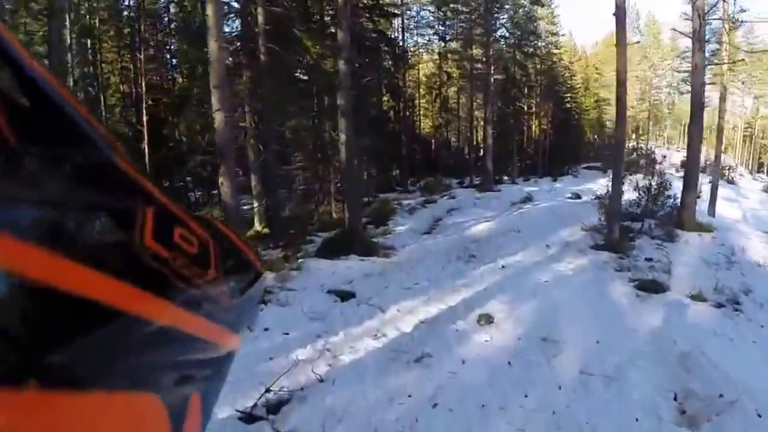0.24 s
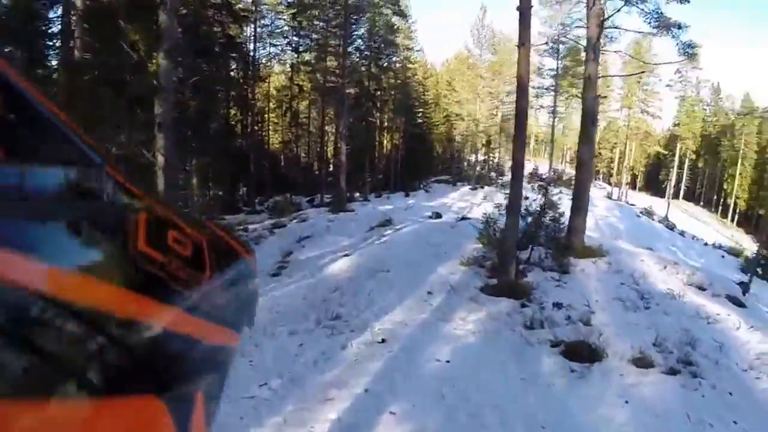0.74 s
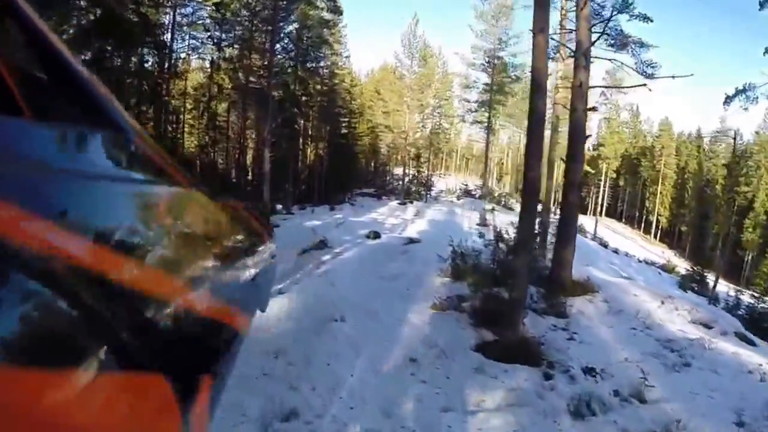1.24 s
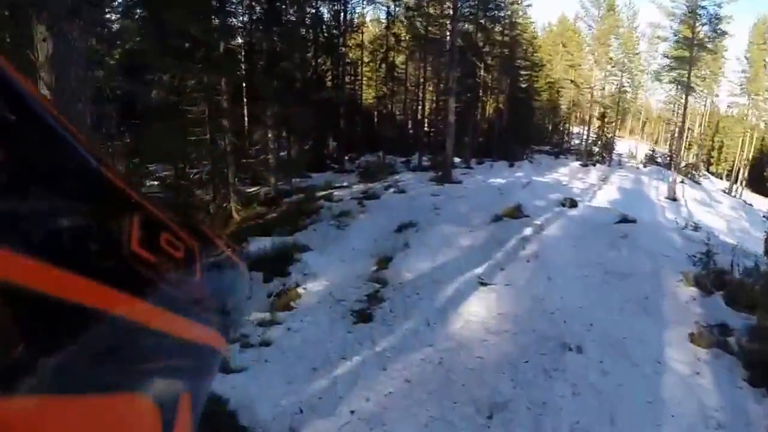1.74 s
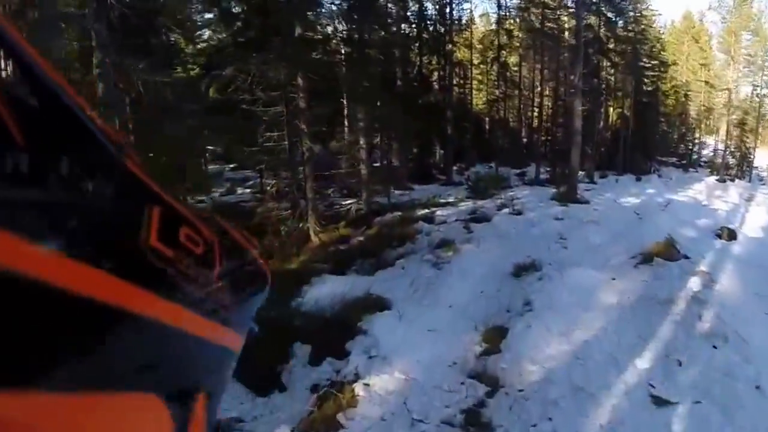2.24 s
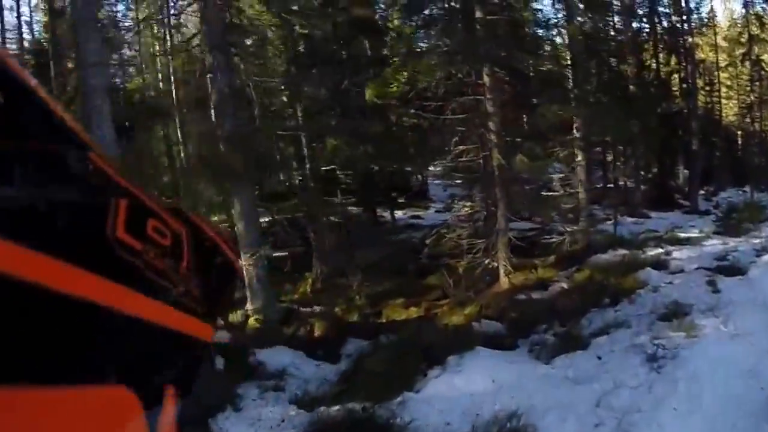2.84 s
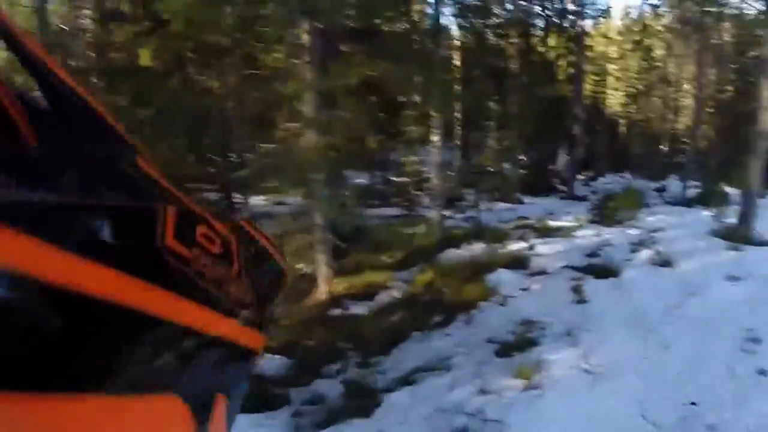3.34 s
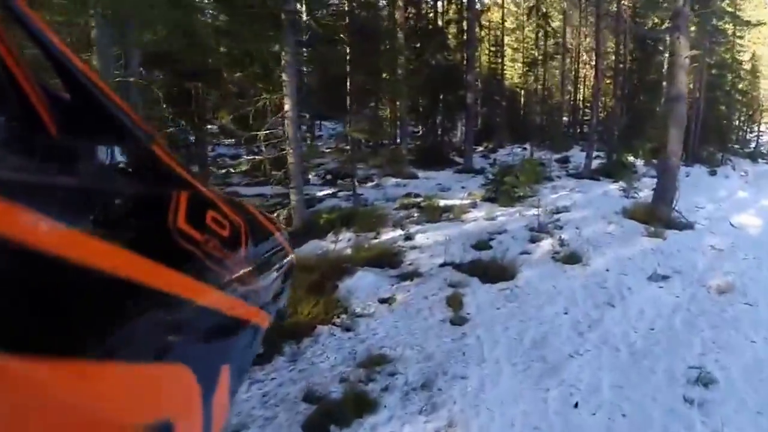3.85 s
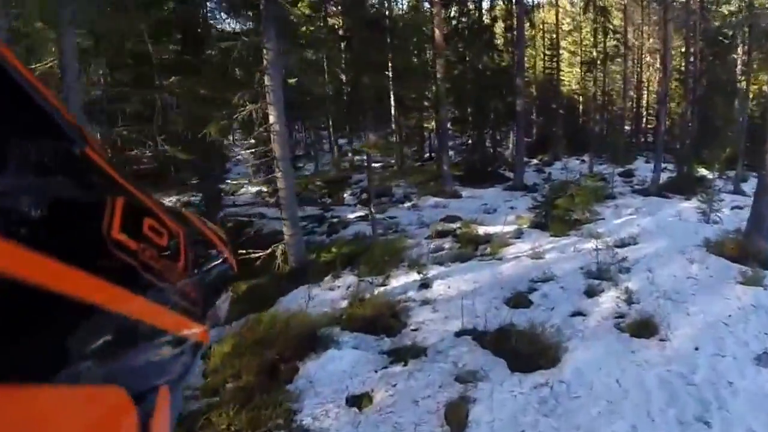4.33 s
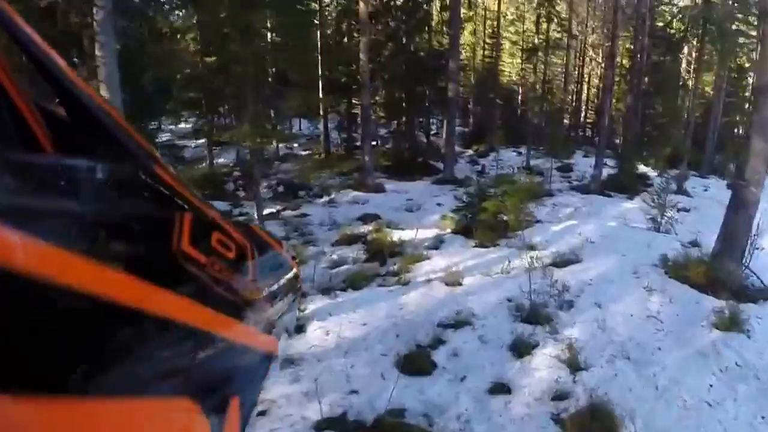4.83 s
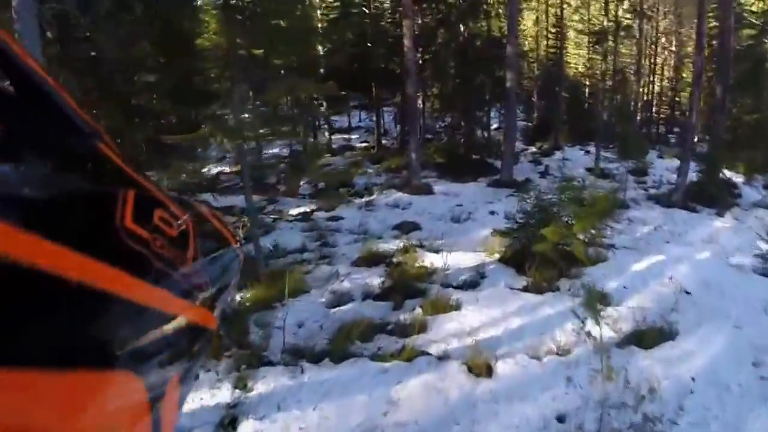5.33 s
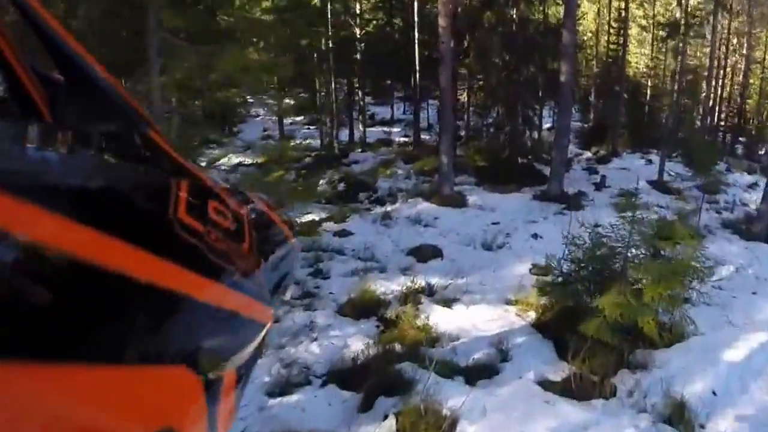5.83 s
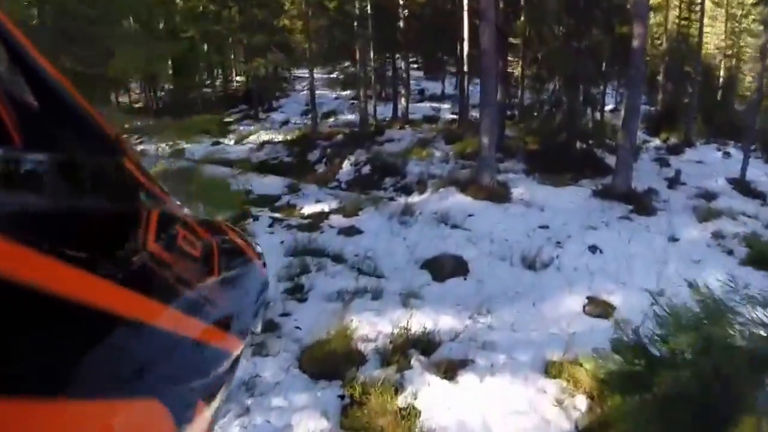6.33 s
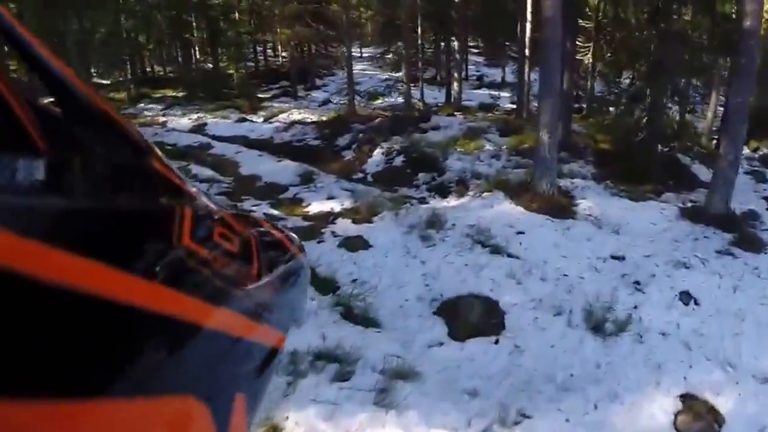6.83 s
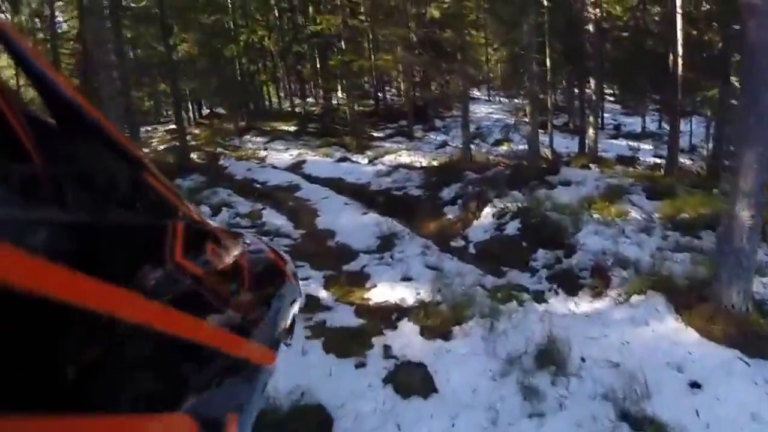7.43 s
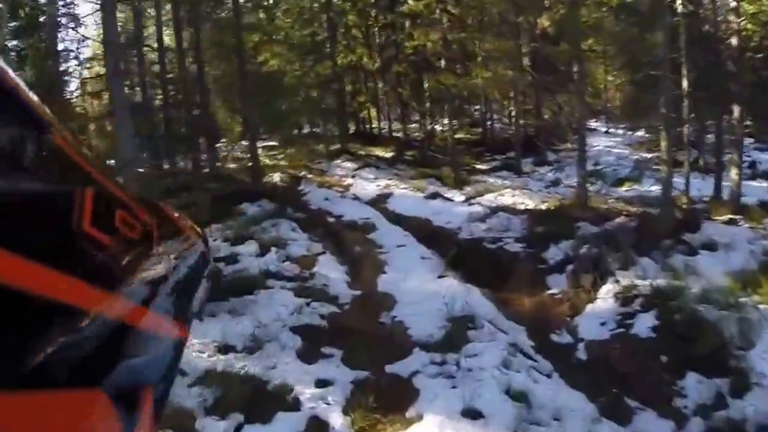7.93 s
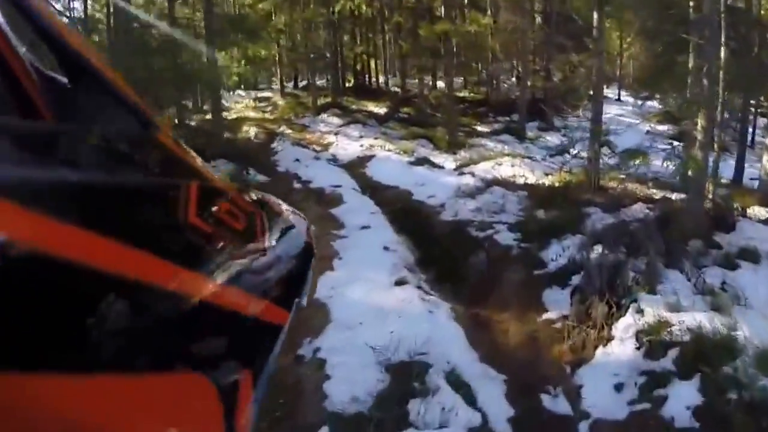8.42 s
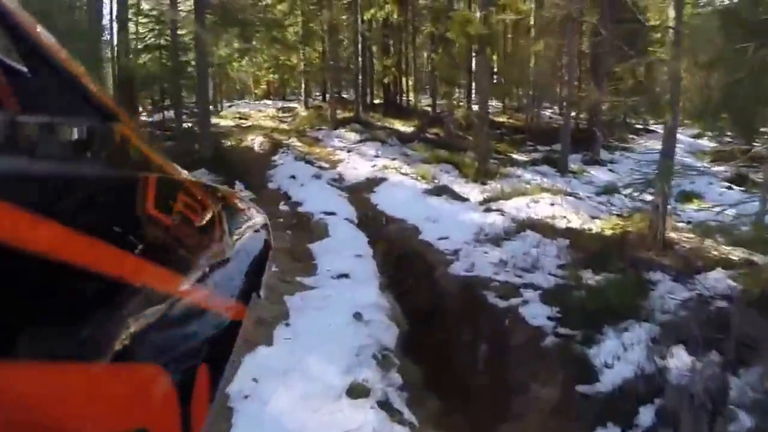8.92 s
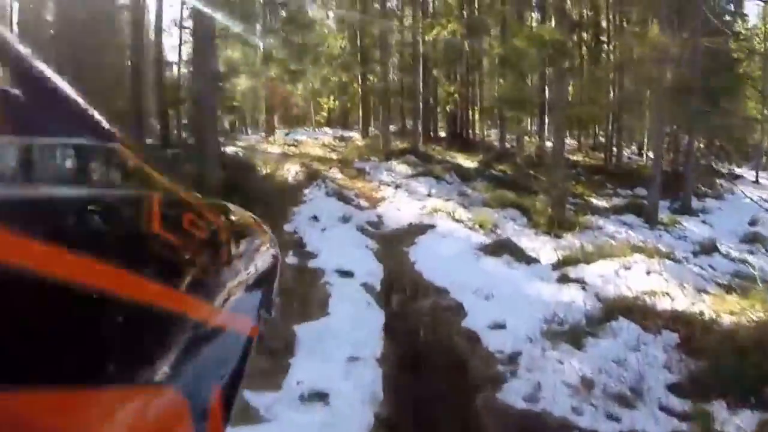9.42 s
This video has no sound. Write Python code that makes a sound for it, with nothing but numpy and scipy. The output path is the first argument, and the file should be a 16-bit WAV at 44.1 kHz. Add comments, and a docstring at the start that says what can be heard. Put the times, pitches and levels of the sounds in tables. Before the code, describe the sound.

A small two-stroke dirt bike rides slowly over rough forest ground, heard close and dry from the rider's helmet for nearly ten seconds. From the start the engine makes a deep, stumbling hum under a pulsing rush of exhaust. At about 0.5 seconds the throttle opens briefly. Then the engine runs on little gas, firing irregularly around ten times a second, each rasping pop giving a short, tinny ring in the steel pipe. Bumps send dull thuds and knocks through the frame near 0.9 and 2.2 seconds, hardest between 3.1 and 3.5. The firings grow stronger from about 4.5 to 5 seconds, then thin out, with more knocks around 7.4 and 7.8. At 8.7 seconds a short roar comes with a thump. From 9 seconds the throttle opens again and the engine speeds up slightly until the end.

```python
"""A small two-stroke motorcycle picks its way through a snowy forest, heard from the rider's helmet.
From the start the crank's once-a-turn shake is a deep hum. At 0.5 s the throttle opens briefly; then,
on little throttle, the cylinder fires only every few turns, each rasping burst ringing the thin steel
pipe. Bumps in the ground knock through the frame, hardest near 3.4 s. A short roar comes at 8.7 s,
and from 9 s the throttle opens again and the engine speeds up."""
import sys
import numpy as np
from scipy import signal
from scipy.fft import rfft, irfft, next_fast_len
from scipy.io import wavfile
from scipy.ndimage import uniform_filter1d, map_coordinates

SR = 44100
rng = np.random.default_rng(int(sys.argv[2]) if len(sys.argv) > 2 else 0)


def persist_wave(psi):
    """Save psi, clipped to +-1, as 16-bit WAV."""
    counts = np.round(np.clip(psi, -1, 1) * 32767).astype(np.int16)
    wavfile.write(sys.argv[1], SR, np.atleast_2d(counts).T)


N = 426447
FFT_SIZE = next_fast_len(N + SR // 4)
GRID_HZ = np.fft.rfftfreq(FFT_SIZE, 1 / SR)

# Levels in all tables are relative: each layer adds its own offset.
# running noise between firings: (time [s], gas rush [dB], frame rumble [dB])
RUNNING_NOISE = [(0.0, -49, -48), (0.38, -52.5, -53), (0.65, -46, -41.5), (0.89, -56, -45),
                 (1.64, -54.5, -46), (1.94, -53.5, -44.5), (2.18, -51.5, -47), (2.64, -53, -47.5),
                 (3.39, -52, -45), (3.69, -54.5, -51), (4.74, -51.5, -45), (4.93, -52.5, -51.5),
                 (5.6, -54.5, -51.5), (6.73, -53, -50.5), (7.03, -52, -50.5), (7.78, -52.5, -50),
                 (8.62, -54.5, -48), (8.92, -55, -46), (9.15, -52, -51), (9.35, -52.5, -58),
                 (9.67, -47.5, -59)]
# how strongly the pipe answers the gas: (time [s], neck [dB], belly [dB], pop [dB])
PIPE_RESPONSE = [(0, -6, -2, 3), (.45, -2, -10, -2), (.65, -2, -4, -3), (.8, 2, -5, -4), (.88, -4, -8, -2),
                 (1.0, -5.5, -8, 4), (1.4, -9, -11, 4), (1.7, -6, -2, 5), (2.0, 1.5, -8, -3.5),
                 (2.5, 2, -10, -23), (2.85, 1.5, -2, -3), (3.5, -2.5, 11, -2), (4.0, -2, -3, 2),
                 (4.55, -0.5, 6, -3.5), (4.9, 5.5, 3, -7), (5.3, -0.5, 4, 3), (5.7, 2, 6, 1),
                 (6.5, 1, 7, -1.5), (6.95, -2, 0, -1), (7.2, -10, -3, 4), (7.55, 0.5, 1, 1),
                 (8.0, 1.5, 4, -17), (8.3, 1, 3, -27), (8.55, -1, 13, -3), (8.8, 2.5, -6, -10),
                 (9.12, 6.5, -6, 4), (9.2, 4, -2, -5), (9.67, 2, 12, -4)]
# firings: (time [s], rasp [dB], neck [dB], belly [dB], growl [dB], bright edge [dB], neck pitch [Hz])
CYLINDER_FIRINGS = [(0.044, -37, -37, -47, -43, -48.5, 2770), (0.189, -33, -45, -48, -47, -58, 2750),
                    (0.266, -38, -44, -59, -48, -48, 2910), (0.345, -32, -39, -46, -39, -48, 2720),
                    (0.425, -27, -35, -55, -37, -46, 2970), (0.501, -24.5, -31.5, -45, -34, -49, 2750),
                    (0.5504, -44, -39, -45, -57, -59, 2910), (0.674, -30, -44, -52, -35.5, -53, 2770),
                    (0.732, -42, -44, -45, -36, -47, 2670), (0.815, -38, -41, -57, -38, -50, 2830),
                    (0.9386, -29, -47, -53, -39, -50, 2790), (1.062, -32, -41, -51, -37, -51, 2940),
                    (1.1293, -32, -45, -52, -36, -48, 2710), (1.1977, -28, -41, -51, -33.5, -53, 2800),
                    (1.2436, -33, -39, -52, -37, -50, 2870), (1.289, -43, -52, -53, -39, -56, 2767),
                    (1.3358, -32, -42, -54, -34.5, -53, 2790), (1.4114, -32, -45, -52, -36, -50, 2965),
                    (1.5149, -36, -41, -47, -39, -53, 2800), (1.59, -36, -49, -56, -57, -55, 2760),
                    (1.6411, -32, -54, -48, -45, -65, 2920), (1.753, -28.5, -40, -45, -46, -49.5, 2900),
                    (1.832, -28, -34.5, -51, -44, -55, 2840), (1.9077, -29, -40, -52, -36, -52, 2810),
                    (1.953, -33, -45, -56, -44, -52, 2960), (2.0019, -28, -47, -55, -35.5, -54, 2890),
                    (2.048, -30.5, -40, -49, -37, -61, 2730), (2.1237, -31, -36, -50, -38, -47.5, 2700),
                    (2.249, -39, -38, -46, -36, -49, 2920), (2.379, -29.5, -32.5, -44, -37, -46, 2890),
                    (2.4785, -38, -49, -45, -51, -57, 2810), (2.5342, -28, -33, -42, -33, -45.5, 2870),
                    (2.6354, -36, -44, -48, -52, -67, 2800), (2.7133, -34, -38, -39, -44, -62, 2910),
                    (2.7911, -42, -39, -41, -38, -57, 2713), (2.8662, -32, -39, -41, -39, -55, 2930),
                    (2.9931, -36, -36, -40, -36, -49, 2880), (3.238, -42, -38, -46, -38.5, -58, 2620),
                    (3.424, -48, -44, -47, -39, -51, 2630), (3.5446, -44, -49, -50, -50, -58, 2740),
                    (3.696, -35, -43, -45, -51, -55, 2890), (3.7702, -39, -52, -45, -52, -57, 2620),
                    (3.8489, -42, -43, -45, -52, -63, 2630), (3.8995, -32, -38.5, -41, -42, -50, 2900),
                    (3.9998, -42, -37.5, -43, -53, -55, 2710), (4.087, -35, -35.5, -39, -47, -47, 2915),
                    (4.192, -29.5, -32, -44, -35, -54, 2870), (4.2978, -33, -39, -42, -37, -59, 2750),
                    (4.4104, -31, -37, -38, -37, -51, 2860), (4.4927, -33, -33, -41, -40, -53, 2857),
                    (4.5451, -32, -30.5, -52, -38, -52, 2800), (4.5949, -27, -31.5, -37.5, -32, -60, 2860),
                    (4.6425, -29, -33, -44, -33, -52, 2880), (4.7748, -37, -30, -38, -41, -49, 2910),
                    (4.822, -25, -28.5, -48, -31.5, -60, 2880), (4.868, -30, -29.5, -39, -32, -48, 2890),
                    (4.9172, -29, -35, -42, -32.5, -46, 2943), (5.009, -38, -40, -42, -38, -52, 2890),
                    (5.0893, -34, -35, -46, -44, -62, 2800), (5.1437, -40.5, -50, -40, -47, -61, 2690),
                    (5.226, -30, -33, -41, -45, -53, 2885), (5.3616, -36, -39, -41, -45, -52, 2635),
                    (5.553, -36, -36, -41, -43, -55, 2617), (5.6828, -42, -41, -45, -47, -53, 2705),
                    (5.7484, -37, -51, -54, -59, -59, 2900), (5.855, -42, -39, -39, -49, -49.5, 2614),
                    (5.9419, -30.5, -36, -37, -46, -48, 2600), (6.0593, -31, -43, -34, -40, -49, 2630),
                    (6.1665, -36, -35.5, -35.5, -39, -45, 2636), (6.4686, -30, -40, -35.5, -35, -51, 2607),
                    (6.593, -49, -42, -46, -39.5, -65, 2760), (6.6499, -45, -44, -37.5, -42, -59, 2616),
                    (6.7291, -36, -37, -37, -39, -44, 2570), (6.868, -39, -49, -37, -50, -49, 2740),
                    (6.971, -42, -45, -43, -62, -51, 2710), (7.1281, -35, -47, -46, -42, -45, 2800),
                    (7.255, -37, -44, -47, -39, -44, 2960), (7.428, -30, -45, -43, -37.5, -47, 3006),
                    (7.5251, -34, -39, -46, -41, -64, 2653), (7.658, -38, -36, -45, -38, -44, 2680),
                    (7.7753, -37, -38, -52, -39, -48, 2786), (7.8972, -37, -31, -39, -37, -44, 2890),
                    (8.1815, -32.5, -39.5, -43, -34, -51, 2664), (8.308, -33, -40, -56, -38, -46, 2655),
                    (8.4418, -30.5, -36, -34.5, -37, -53, 2910), (8.5773, -30.5, -35, -37, -36, -47, 2920),
                    (8.6886, -28, -33, -37, -33.5, -46, 2810), (8.7362, -23.5, -27.5, -38, -28, -52, 2740),
                    (8.754, -27, -30, -40, -33, -46, 2870), (8.7788, -35, -34, -40, -41, -57, 2585),
                    (8.8575, -35, -53, -41, -43, -54, 2724), (8.931, -33, -39, -47, -42, -52, 2890),
                    (9.0046, -26, -31.5, -39, -33.5, -50, 2950), (9.1139, -28, -34, -38, -37.5, -48, 2683),
                    (9.2062, -40, -46, -41, -54, -62, 2633), (9.2914, -45, -43, -40, -50, -69, 2960),
                    (9.406, -29, -38, -40, -40, -51, 2940), (9.6036, -41, -37, -37, -52, -54, 2835)]
FIRING_S, RASP_DB, NECK_DB, BELLY_DB, GROWL_DB, EDGE_DB, NECK_HZ = np.transpose(CYLINDER_FIRINGS)
ONSET_S = FIRING_S - .0022  # the gas starts to hiss just ahead of each firing


def amp(db):
    """Amplitude ratio of a level in decibels."""
    return 10 ** (np.asarray(db) / 20)


def unit(x):
    """Normalisation to unit RMS."""
    return x / np.sqrt(np.mean(x ** 2) + 1e-20)


def curves(rows):
    """Linear interpolation: one value per sample for each column after the time."""
    times, *columns = np.transpose(rows)
    return [np.interp(np.arange(N) / SR, times, column) for column in columns]


def wobble(rate):
    """Random modulation: a smooth curve with rate knots a second."""
    return map_coordinates(rng.standard_normal(int(N * rate / SR) + 4), [np.arange(N) * rate / SR])


def colour(points):
    """Spectral envelope: gain through (frequency [Hz], level [dB]) points on a log axis."""
    hz, db = np.transpose(points)
    return amp(np.interp(np.log(GRID_HZ + 1), np.log(hz + 1), db))


def modes(table):
    """Modal superposition: causal resonances summed with alternating sign."""
    f = GRID_HZ
    return sum((-1) ** k * amp(db) * 1j * f * width / (hz * hz - f * f + 1j * f * width)
               for k, (hz, width, db) in enumerate(table))


def noise(envelope, response):
    """Source and filter: white noise under an envelope passes through a response of unit power."""
    spectrum = rfft(envelope * rng.standard_normal(N), FFT_SIZE)
    return irfft(spectrum * response / np.sqrt(np.mean(np.abs(response) ** 2)), FFT_SIZE)[:N]


def bursts(times, levels_db, rise, fall):
    """Impulse response: each puff of gas rises and falls exponentially (time constants in s)."""
    impulses = np.bincount(np.clip(np.round(times * SR).astype(int), 0, N - 1), amp(levels_db), N)
    quick, slow = np.exp(-1 / (SR * rise)), np.exp(-1 / (SR * fall))
    return signal.lfilter([1 - quick], np.convolve([1, -quick], [1, -slow]), impulses)


def pings(times, levels_db, table, attack, t60, spread, favoured_hz=None, phase_scatter=4):
    """Free vibration: each blow rings the same modes at new strengths, slightly off pitch."""
    out, t = np.zeros(N + SR), np.arange(SR // 12) / SR
    hz, _, mode_db = np.transpose(table)
    envelope = (1 - np.exp(-t / attack)) ** 2 * amp(-60 * t / t60)
    chance = rng.standard_normal((len(times), 3, len(hz)))
    for k, (s, db, (strength, detune, phase)) in enumerate(zip(times, levels_db, chance)):
        # modes lose 6 dB per 70 Hz from the favoured pitch, 15 dB at most
        far_db = 0 if favoured_hz is None else -6 * np.minimum(np.abs(hz - favoured_hz[k]) / 70, 2.5)
        angles = 2 * np.pi * np.outer(hz * (1 + spread * detune), t) + phase_scatter * phase[:, None]
        ring = unit(amp(mode_db + far_db + 2.2 * strength) @ np.sin(angles))
        out[max(round(s * SR), 0):][:len(t)] += amp(db) * envelope * ring
    return out[:N]


def patchy(x, depth_db):
    """Spectral modulation: random gain in patches about 1 kHz wide and 25 ms long."""
    spectra = signal.stft(x, nperseg=256)[2]
    field = uniform_filter1d(rng.standard_normal(spectra.shape), size=5, axis=0)
    field = uniform_filter1d(field, size=8, axis=1)
    return signal.istft(spectra * amp(depth_db * unit(field)), nperseg=256)[1][:N]


def microphone_hiss():
    """Self-noise: the microphone adds a faint, steady treble."""
    # hiss spectrum: (frequency [Hz], density [dB])
    spectrum = [(3000, -42), (9000, -18), (12000, 4), (15300, -2)]
    return noise(amp(-76), colour(spectrum))


def frame_rumble(puffs):
    """Forced vibration: the pulsing gas booms in the frame."""
    # rumble spectrum: (frequency [Hz], density [dB])
    spectrum = [(25, 5), (70, -7.5), (120, 0), (170, -1), (200, 3.5), (240, -4.5), (330, -5.5),
                (450, -11.5), (700, -32), (1500, -72)]
    _, rumble_db = curves(RUNNING_NOISE)
    return noise(amp(rumble_db + 0.5 + wobble(16)) * puffs, colour(spectrum))


def knocks(t60=0.026):
    """Heavy damping: each sharp knock rings briefly and is still; the two near 1 kHz, at 1.25 s and 1.34 s, are
    the ring of firing pops."""
    # sharp knocks: (time [s], level [dB], pitch [Hz])
    strikes = [(.926, -35, 230), (.941, -35, 260), (1.247, -47, 1020), (1.343, -45, 1008),
               (3.054, -35, 120.3), (3.170, -27.5, 169.4), (3.435, -40, 1350), (7.255, -43, 260.9),
               (7.360, -35, 269.5), (7.387, -35, 238), (7.412, -34, 218.7)]
    out, t = np.zeros(N + SR), np.arange(SR // 10) / SR
    for s, db, hz in strikes:
        envelope = amp(db + 9 - 60 * t / t60) * (1 - np.exp(-t / 0.0023))
        out[round(s * SR):][:len(t)] += envelope * np.sin(2 * np.pi * hz * t)
    return out[:N]


def bumps(t60=0.098):
    """Impact excitation: a jolt sets two frame members thudding, with a rough, soft start."""
    # bumps in the ground: (time [s], level [dB], pitch [Hz])
    jolts = [(.479, -31.5, 210), (.758, -33, 190), (0.899, -29.5, 198.3), (1.013, -38, 170),
             (1.226, -36, 239), (2.17, -32, 197), (2.2, -34, 174.6), (2.235, -34, 200), (2.297, -32, 192),
             (2.536, -41, 138.7), (2.73, -32.5, 139.3), (2.868, -36, 192), (3.304, -34, 210.2),
             (3.423, -26.5, 201.6), (3.448, -27, 211), (3.481, -44, 194.5), (3.516, -35, 191.4),
             (4.185, -35.5, 202.5), (4.689, -35.5, 162), (4.776, -33, 207.6), (6.275, -44, 345.5),
             (6.37, -47, 339.4), (6.6, -41, 190), (7.727, -35, 147), (7.77, -36, 205.8), (7.843, -38, 186),
             (8.273, -33.5, 207), (8.67, -33.5, 230.5), (8.702, -28, 246), (8.735, -31, 225)]
    out, t = np.zeros(N + SR), np.arange(SR // 3) / SR
    for s, db, hz in jolts:
        rough = uniform_filter1d(rng.standard_normal(len(t)), size=150)
        thud = np.sin(2 * np.pi * hz * t) + 0.22 * np.sin(2 * np.pi * 1.42 * hz * t)
        swell = (1 - np.exp(-t / 0.01)) * (1 + 0.35 * unit(rough))
        out[round(s * SR):][:len(t)] += amp(db + 4.5 - 60 * t / t60) * swell * thud
    return out[:N]


def crank_hum():
    """Structure-borne sound: the crank shakes about once a turn, and the microphone mount with it."""
    # the stumbling hum: (time [s], pitch [Hz], level [dB])
    course = [(0.02, 51.2, -21), (0.12, 44.5, -20), (0.18, 46.7, -42), (0.22, 42.2, -25), (0.27, 35.1, -31),
              (0.35, 38.3, -24), (0.38, 34.4, -34), (0.42, 40.2, -22), (0.51, 38.6, -27), (0.66, 48.4, -23),
              (0.69, 52.1, -31), (0.72, 46.2, -29), (0.76, 39.6, -47), (0.801, 47.7, -30),
              (0.87, 45.7, -19.5), (0.95, 36.58, -34), (0.99, 43.54, -24), (1.07, 36.2, -26.5),
              (1.18, 44.2, -22), (1.49, 41.8, -27), (1.53, 38.7, -40), (1.58, 42.3, -25), (1.63, 35.9, -36),
              (1.68, 40.8, -27), (1.74, 32.8, -33.5), (1.91, 41.3, -24.5), (2.15, 39.14, -32.5),
              (2.219, 41.1, -25), (2.27, 35.96, -34), (2.31, 42.1, -25.5), (2.52, 35.9, -27),
              (2.61, 41, -21), (2.75, 37.35, -26), (2.91, 41.35, -17.5), (2.98, 37.1, -26.5),
              (3.06, 44.5, -14.5), (3.11, 43.26, -20), (3.14, 40.5, -39), (3.18, 42, -19.5),
              (3.24, 44.6, -18.5), (3.3, 43, -29.5), (3.33, 52.3, -52), (3.38, 42.9, -28), (3.44, 44, -29),
              (3.5, 37.7, -41), (3.55, 41.2, -30.5), (3.72, 38.7, -31.5), (3.77, 41, -28.5),
              (3.92, 36.5, -36), (3.98, 42.6, -23.5), (4.04, 34.4, -38), (4.19, 39.3, -26),
              (4.28, 40.8, -27.5), (4.31, 34.72, -40), (4.35, 40.2, -26), (4.4, 32.75, -34),
              (4.47, 38.2, -27), (4.62, 38.5, -36), (4.73, 44.5, -26), (4.78, 35.6, -42), (4.82, 38.7, -32),
              (4.861, 38.5, -34), (4.94, 45.7, -23.5), (5.09, 41.54, -31), (5.13, 34.86, -36),
              (5.18, 40.56, -31.5), (5.27, 35.67, -38), (5.311, 38.66, -25), (5.36, 31.7, -37),
              (5.41, 40.1, -25), (5.49, 34.13, -34), (5.61, 42.07, -25.5), (5.671, 43.9, -44),
              (5.7, 38.65, -31), (5.73, 33.63, -47), (5.76, 40, -33.5), (5.92, 39.2, -26),
              (5.96, 34.63, -39), (6.0, 40.17, -23), (6.06, 33.0, -41), (6.12, 36.7, -30.5),
              (6.18, 31, -36), (6.22, 39.86, -31.5), (6.35, 40.8, -29.5), (6.4, 34.26, -39),
              (6.45, 39.23, -29.5), (6.49, 33.4, -45), (6.54, 44.36, -29.5), (6.58, 41, -53),
              (6.62, 42.7, -26.5), (6.67, 34.76, -43), (6.7, 40.23, -35), (6.83, 39.06, -35.5),
              (6.87, 34.67, -43), (6.93, 44.7, -31.5), (6.98, 37.94, -44), (7.01, 40.9, -34),
              (7.15, 40.3, -34), (7.19, 33.9, -36.5), (7.39, 38, -32.5), (7.5, 45, -36), (7.61, 43.9, -24),
              (7.68, 38.3, -31.5), (7.75, 43.37, -24), (7.81, 37.7, -40), (7.88, 42.97, -26.5),
              (8.47, 36.43, -34.5), (8.6, 40, -26.5), (8.68, 37.6, -32), (8.72, 34.6, -36), (8.77, 44, -36),
              (8.82, 48.8, -38), (8.86, 47.85, -33), (8.91, 44, -26), (8.98, 37.38, -42),
              (9.07, 45.44, -24.5), (9.65, 46.33, -16.5)]
    # band in which the mount shakes: (frequency [Hz], density [dB])
    mount_band = [(18, -43), (30, 1), (42, -21), (52, 7), (62, -30), (80, -82)]
    s, hz, db = np.transpose(course)
    hum_hz, level = curves(np.transpose([s, hz, amp(db)]))
    angle = 2 * np.pi * np.cumsum(hum_hz) / SR
    sway = np.minimum(uniform_filter1d(level, size=SR // 4), amp(-25))  # follows the hum up to a limit
    shake = sway * noise(amp(-14), colour(mount_band))
    return np.sqrt(2) * level * amp(0.4 * wobble(16)) * np.sin(angle) + shake


def throttle_pulls():
    """Harmonics of a periodic source: even firing draws overtones, blurred by timing scatter."""
    # open throttle, one list a pull: (time [s], turn rate [Hz], level [dB])
    pulls = [
        [(.5, 46.5, -70), (.54, 49.5, -46), (.6, 52, -44), (.65, 53.7, -46), (.68, 53.8, -70)],
        [(9.05, 46.5, -75), (9.15, 47.2, -61), (9.34, 47.5, -59), (9.42, 47.6, -54), (9.57, 48.6, -54),
         (9.67, 49.3, -54)],
    ]
    # overtones, one list a pull: (multiple of the turn rate, level [dB])
    harmonics = [
        [(2, -6), (3, -0.5), (4, -13), (5, -3), (6, -1), (8, -10), (9, -7.5)],
        [(2, 3), (7, -10), (10, 0), (19, -10)],
    ]
    out = np.zeros(N)
    for rows, overtones in zip(pulls, harmonics):
        turn_hz, pull_db = curves(rows)
        angle = 2 * np.pi * np.cumsum(turn_hz) / SR + .09 * wobble(30)
        gain = amp(pull_db + 2.5 * wobble(22))
        for k, db in overtones:
            out += amp(db) * gain * np.sin(k * angle + rng.uniform(0, 2 * np.pi))
    return out


def port_puffs():
    """Flow modulation: the port opens once a turn, fired or not. Gives a soft and a sharp gate."""
    # crank speed: (time [s], turn rate [Hz])
    crank_speed = [(0, 47.1), (.19, 45.2), (.3, 38.86), (.5, 40.5), (.63, 48.3), (.85, 45.3), (1.0, 43),
                   (1.4, 41.7), (1.55, 38.34), (2.0, 40.06), (2.95, 39.6), (3.1, 42), (3.65, 41.3),
                   (4.1, 38.02), (4.55, 38.66), (4.97, 41.24), (5.15, 37.51), (6.15, 35.22), (6.3, 37.45),
                   (7.4, 39.65), (7.52, 42.4), (8.05, 42.1), (8.25, 38.27), (8.7, 38.02), (8.83, 44.7),
                   (9.2, 45.9), (9.67, 48.4)]
    turns = np.cumsum(curves(crank_speed)[0]) / SR
    times = np.flatnonzero(np.diff(np.floor(turns))) / SR
    strength = rng.standard_normal(len(times))
    soft = unit(0.93 + bursts(times, 4 * strength, rise=0.0039, fall=0.0039))
    sharp = unit(.3 + bursts(times, 2.5 * strength, rise=.002, fall=.006))
    return soft, sharp


def roar_gates(edge_s=0.01):
    """Sustained flow: envelopes for the stretches where the gas roars without a gap."""
    # roars: (start [s], length [s], rasp [dB], growl [dB], boom [dB])
    roars = [(0.51, 0.14, -55, -51, -51), (.675, 0.14, -65, -61, -54), (1.05, 0.47, -76, -79, -57),
             (8.744, 0.071, -50.5, -51.5, -54), (9.39, .3, -58, -58, -53.5)]
    t, gates = np.arange(N) / SR, np.zeros((3, N))
    for s, length, *db in roars:
        inside_s = np.minimum(t - s, s + length - t)
        gates += np.outer(amp(db), np.clip(inside_s / edge_s + .5, 0, 1))
    return gates


def duct_gain():
    """Duct resonance: the gas noise is boosted near each mode."""
    # duct modes: (frequency [Hz], width [Hz], boost [dB])
    resonances = [(740, 170, 4.5), (1252, 19, 5.5), (1475, 18, 4), (3560, 110, 4.5), (4655, 265, 10),
                  (5850, 366, 11), (6970, 970, 6.5), (9350, 230, 5.5), (11655, 200, 11.5)]
    return np.sqrt(1 + np.abs(modes(resonances)) ** 2)


def gas_treble(puffs):
    """Band-limited flow noise: a thin sizzle in one duct, and the highest fizz of the gas."""
    # sizzle and fizz: (time [s], level [dB])
    sizzle_levels, fizz_levels = [(0, -67), (.68, -64), (.8, -60), (.9, -62), (1.9, -57), (2.4, -72),
                                  (3.8, -57.5), (4.9, -60.5), (5.2, -72), (6.9, -70), (7.1, -59),
                                  (7.4, -56), (7.6, -68), (8.2, -68), (9.67, -53.5)], [(0.0, -55), (0.67, -60), (0.89, -64), (1.45, -55),
                                                  (2.88, -98), (3.5, -59), (4.93, -68), (5.14, -70),
                                                  (6.33, -59), (6.63, -76), (7.03, -55), (8.0, -67),
                                                  (8.13, -86.5), (9.4, -81), (9.59, -63), (9.67, -56)]
    # the sizzling duct: (frequency [Hz], width [Hz], level [dB])
    sizzle_mode = [(4600, 260, 0)]
    # fizz spectrum: (frequency [Hz], density [dB])
    fizz_band = [(6000, -40), (9000, -1), (11800, -4), (13000, -6), (15300, -12)]
    sizzle = noise(amp(curves(sizzle_levels)[0] + 1.5 * wobble(16)) * puffs, modes(sizzle_mode))
    fizz = noise(amp(curves(fizz_levels)[0] - 10.5 + 2.2 * wobble(14)) * puffs, colour(fizz_band))
    return sizzle + fizz


def silencer(puffs, roar):
    """Acoustic filtering: gas growls in the silencer, where a narrow drone comes and goes."""
    # growl spectrum: (frequency [Hz], density [dB])
    growl_band = [(250, -1), (550, -5), (1000, -3.5), (1900, -1), (2200, -10), (3200, -22), (6000, -75)]
    # drone: (time [s], level [dB])
    drone_levels = [(0.0, -66), (0.7, -62), (0.83, -67), (1.61, -72), (2.3, -55), (3.26, -48.5),
                    (3.58, -58), (3.9, -57), (4.49, -49.5), (4.85, -49), (5.04, -57), (5.47, -55),
                    (5.82, -59), (6.63, -52.5), (7.0, -64), (8.05, -49), (8.4, -62.5), (9.1, -56),
                    (9.67, -49)]
    # silencer resonance: (frequency [Hz], width [Hz], level [dB])
    drone_mode = [(1770, 230, 0)]
    rush_db, _ = curves(RUNNING_NOISE)
    flow_db = -51.5 + 0.56 * (rush_db - rush_db.mean())  # follows part of the rush's swings
    flow = amp(flow_db + 0.34 * wobble(28)) * puffs
    fired = bursts(ONSET_S, GROWL_DB - 0.3, rise=0.0066, fall=0.0039)
    growl = noise(flow + fired + roar, duct_gain() * colour(growl_band))
    drone = noise(amp(curves(drone_levels)[0] - 4 + 0.97 * wobble(15)) * puffs, modes(drone_mode) ** 2)
    return growl + drone


def exhaust_pops(roar, lag_s=.0052):
    """Transient excitation: low modes answer each firing. Gives a noisy boom and a pitched pop."""
    # pop modes: (frequency [Hz], width [Hz], level [dB])
    pop_modes = [(213, 68, -6), (334, 59, -2), (415, 152, -4), (1004, 95, -17)]
    _, _, response_db = curves(PIPE_RESPONSE)
    scatter_db = rng.standard_normal(len(ONSET_S))
    pop_db = GROWL_DB - 0.5 + response_db[np.round(ONSET_S * SR).astype(int)] + scatter_db
    times = ONSET_S + lag_s
    boom = noise(bursts(times, pop_db - 16, rise=0.0017, fall=0.0066) + roar, modes(pop_modes))
    pop = pings(times, pop_db + 6, pop_modes, attack=0.0012, t60=0.026, spread=.05, phase_scatter=.4)
    return boom, pop


def pipe_wall(taps):
    """Shell resonance: gas drives the steel pipe and firings strike it. Gives noise and ringing."""
    # narrow neck, wide belly and a higher spot of the wall: (frequency [Hz], width [Hz], level [dB])
    neck_modes, belly_modes, clink_modes = [(2616, 130, 5), (2700, 42, 7), (2777, 73, 7.5), (2890, 63, 7.5),
                                            (2970, 53, 3)], [(2320, 50, -23), (2438, 55, -9)], [(3230, 60, 0), (3330, 60, -2)]
    # firings that clink that spot: (time [s], level [dB])
    clinks = [(.501, -41), (1.906, -41), (2.379, -38), (4.917, -42), (8.58, -40), (9.006, -43), (9.41, -40)]
    rush_db, _ = curves(RUNNING_NOISE)
    neck_gain_db, belly_gain_db, _ = curves(PIPE_RESPONSE)
    neck_drive = amp(rush_db + 0.95 * neck_gain_db - 1.2 + 2.2 * wobble(25)) * taps
    neck_drive += bursts(ONSET_S, NECK_DB - 8, rise=0.0036, fall=0.0042)
    belly_drive = amp(rush_db + 0.63 * belly_gain_db - 6 + 0.76 * wobble(25)) * taps
    driven = noise(neck_drive, modes(neck_modes)) + noise(belly_drive, modes(belly_modes))
    neck = pings(ONSET_S, NECK_DB + 0.94, neck_modes, attack=0.0035, t60=0.095, spread=.006,
                 favoured_hz=NECK_HZ)
    belly = pings(ONSET_S, BELLY_DB + 2, belly_modes, attack=0.0025, t60=0.105, spread=.005)
    clink = pings(*np.transpose(clinks), clink_modes, attack=0.0018, t60=0.06, spread=.006)
    return driven, neck + belly + clink


def gas_rasp(puffs, roar):
    """Flow noise: gas rushes through the ducts, and each firing adds a rasp with a bright edge."""
    # gas rush before the ducts: (frequency [Hz], density [dB])
    spectrum = [(1500, -51), (2200, -4.5), (3200, 0), (5300, -14.5), (8400, -19), (10500, -20),
                (13000, -39.5), (15300, -36)]
    rush_db, _ = curves(RUNNING_NOISE)
    rush = amp(rush_db - 0.02 + 1.38 * wobble(20)) * puffs
    rasp = bursts(ONSET_S, RASP_DB - 8, rise=0.0043, fall=0.0056)
    edge = bursts(ONSET_S, EDGE_DB + 3.5, rise=0.0058, fall=0.011)
    response = duct_gain() * colour(spectrum)
    treble_tilt = np.clip(GRID_HZ / 7000, 0, 1.2) ** 2
    return noise(rush + rasp + roar, response) + noise(edge, response * treble_tilt)


def exhaust():
    """Common excitation: the same puffs and firings drive the ducts, pipe, silencer and frame."""
    puffs, taps = port_puffs()
    rasp_roar, growl_roar, boom_roar = roar_gates()
    boom, pop = exhaust_pops(boom_roar)
    wall_noise, wall_ring = pipe_wall(taps)
    gas = frame_rumble(puffs) + gas_treble(puffs) + silencer(puffs, growl_roar)
    gas += boom + wall_noise + gas_rasp(puffs, rasp_roar)
    return patchy(gas, depth_db=1.5) + wall_ring + pop


def scene():
    """Superposition: engine and frame add in one channel."""
    return (crank_hum() + exhaust() + throttle_pulls() + bumps() + knocks())[None]


def record(dry):
    """Band limiting: the sound and the microphone's hiss are cut off above the top frequency."""
    top_hz = 15330
    spectrum = rfft(dry + microphone_hiss(), FFT_SIZE)
    return irfft(spectrum * (GRID_HZ < top_hz), FFT_SIZE)[:, :N]


dry = scene()
out = record(dry)
persist_wave(out)
```